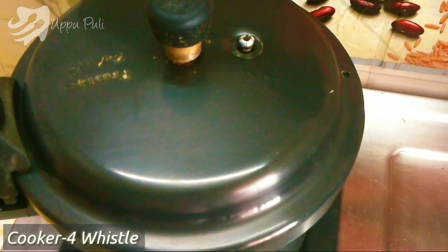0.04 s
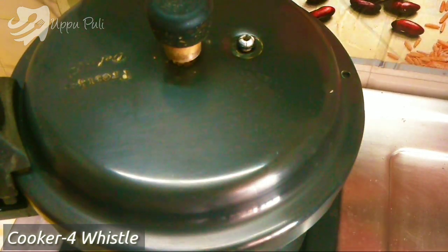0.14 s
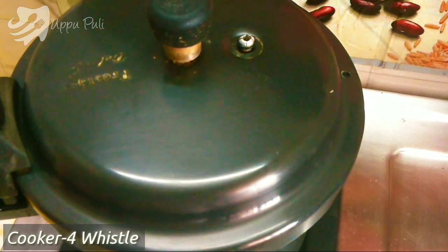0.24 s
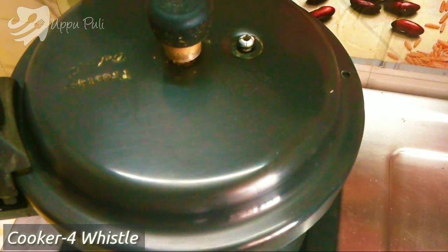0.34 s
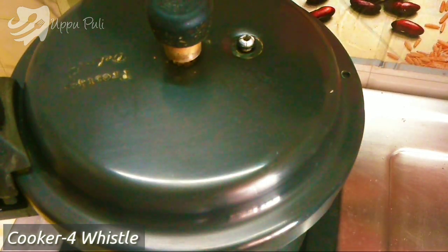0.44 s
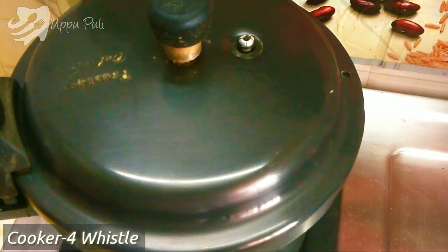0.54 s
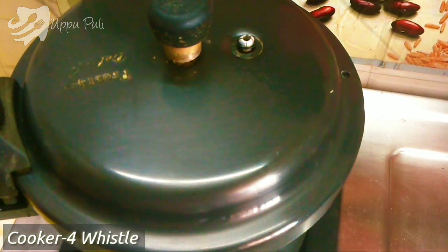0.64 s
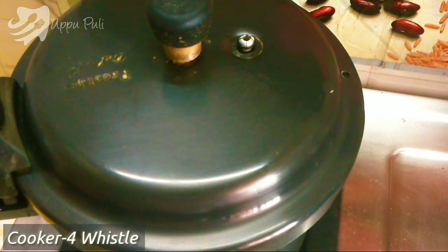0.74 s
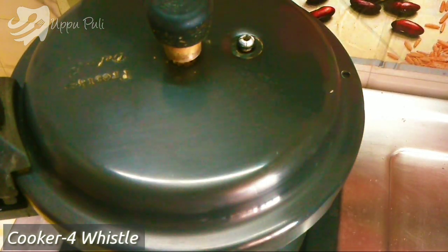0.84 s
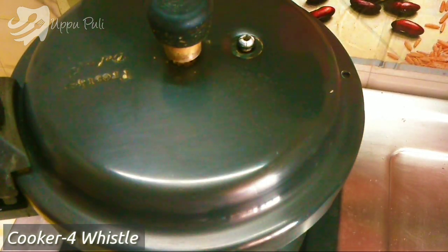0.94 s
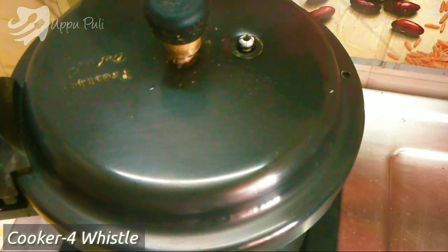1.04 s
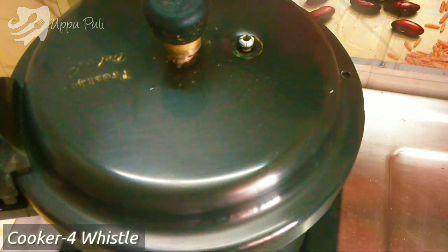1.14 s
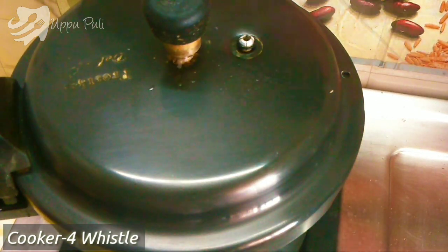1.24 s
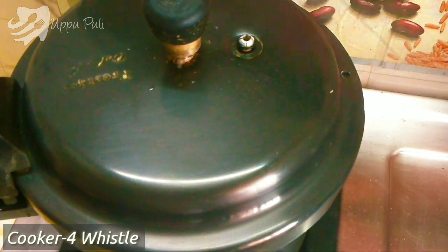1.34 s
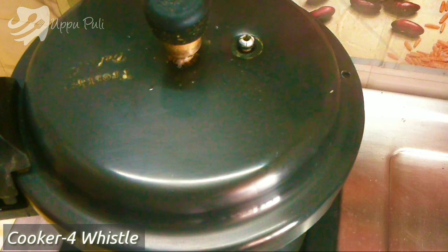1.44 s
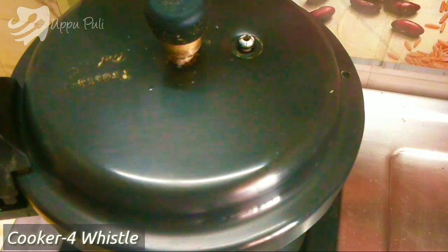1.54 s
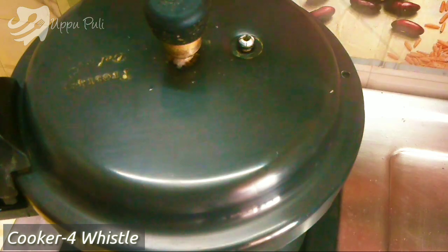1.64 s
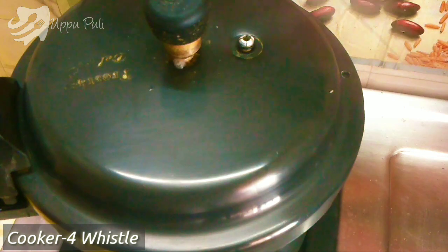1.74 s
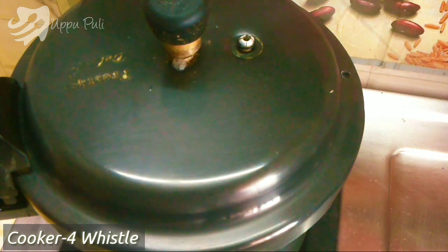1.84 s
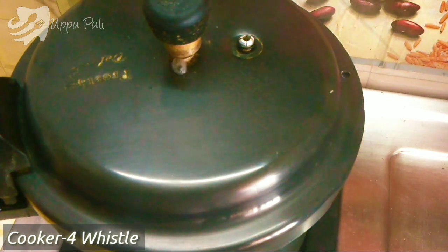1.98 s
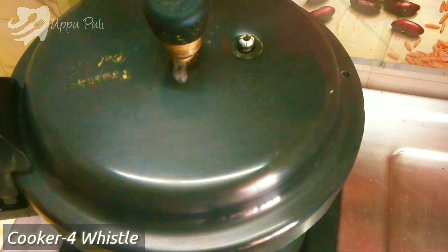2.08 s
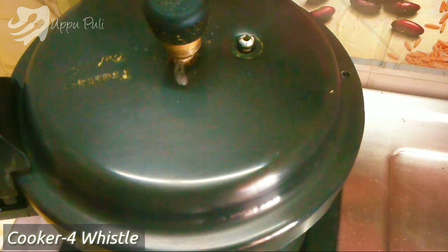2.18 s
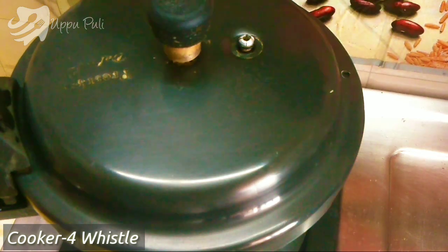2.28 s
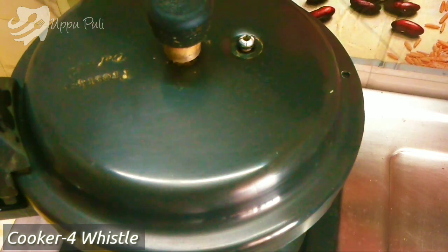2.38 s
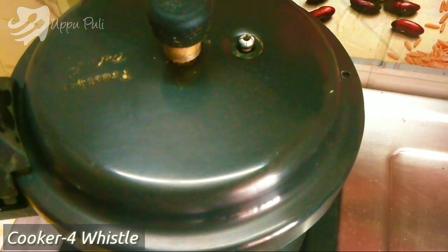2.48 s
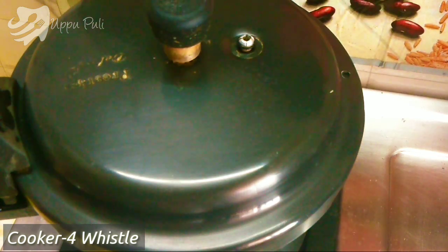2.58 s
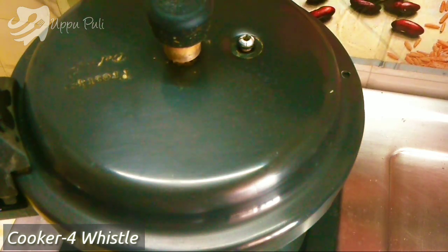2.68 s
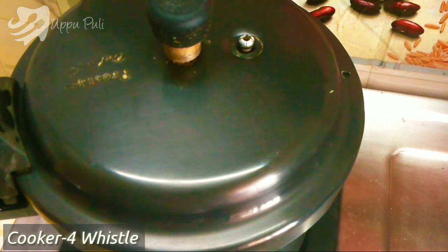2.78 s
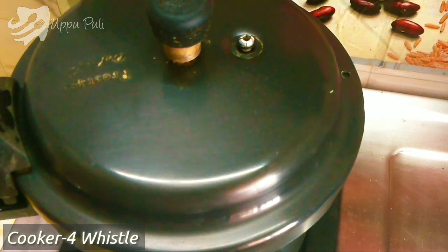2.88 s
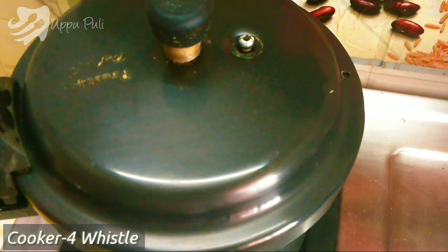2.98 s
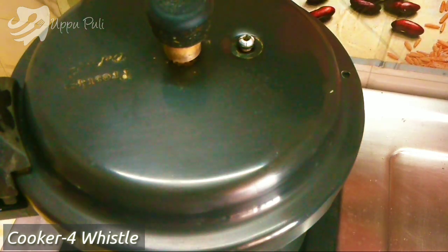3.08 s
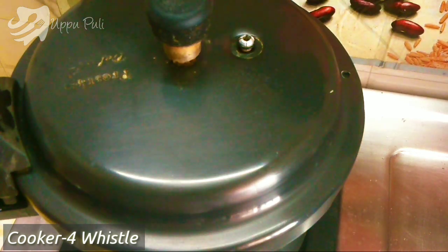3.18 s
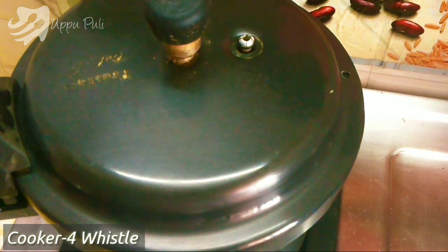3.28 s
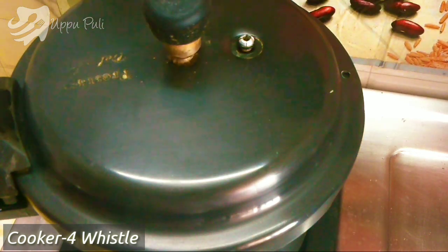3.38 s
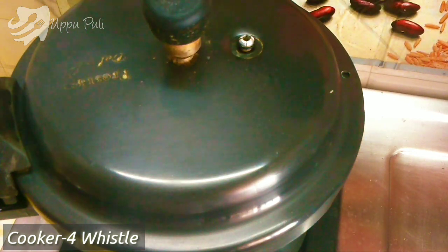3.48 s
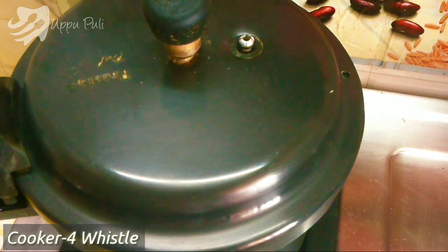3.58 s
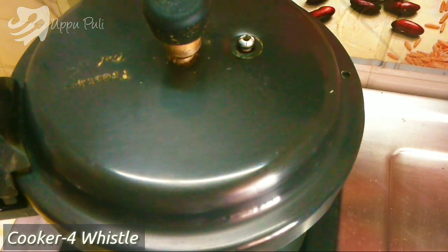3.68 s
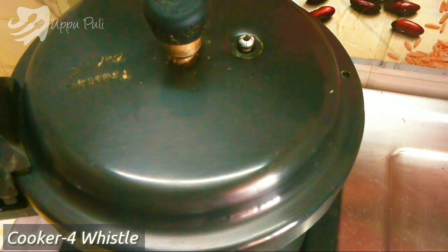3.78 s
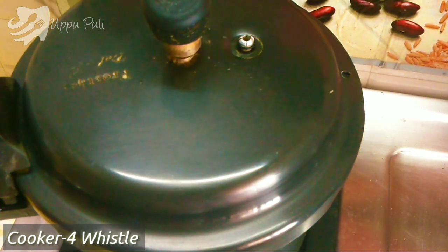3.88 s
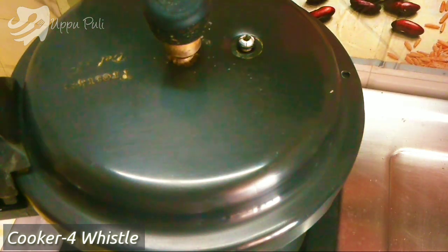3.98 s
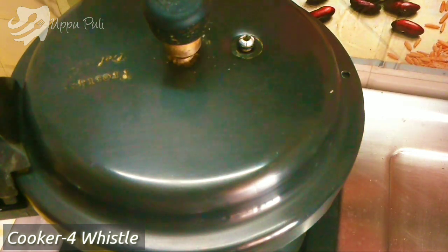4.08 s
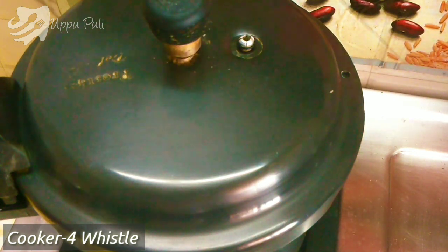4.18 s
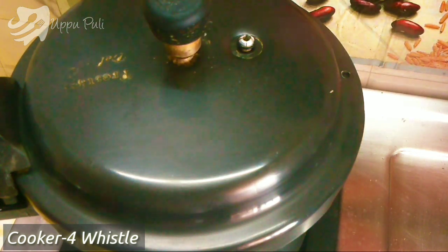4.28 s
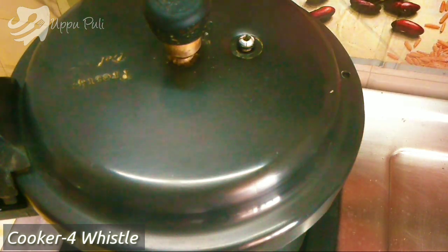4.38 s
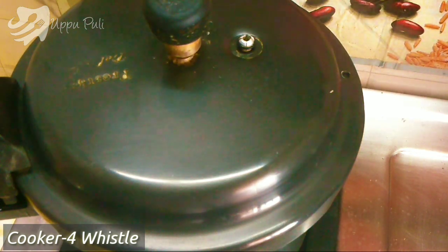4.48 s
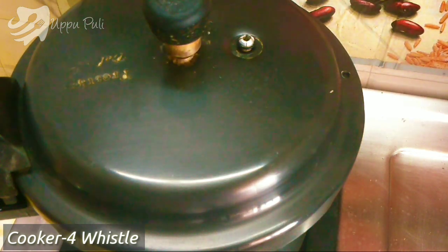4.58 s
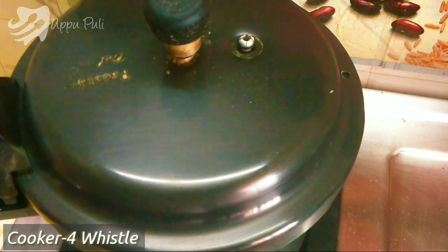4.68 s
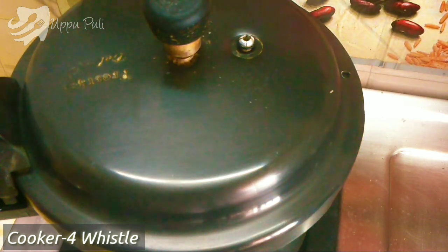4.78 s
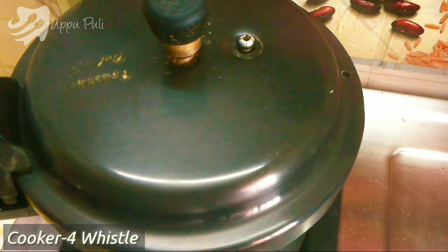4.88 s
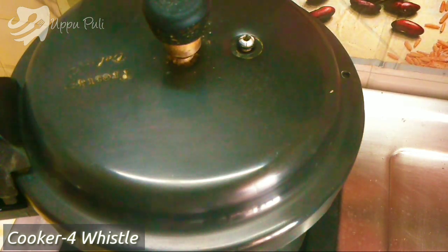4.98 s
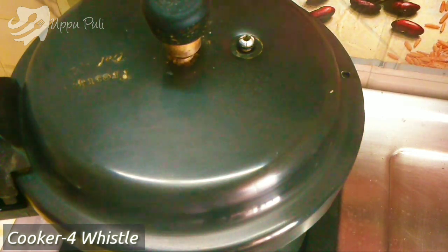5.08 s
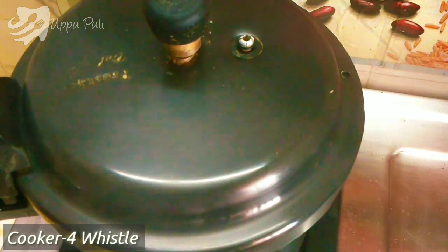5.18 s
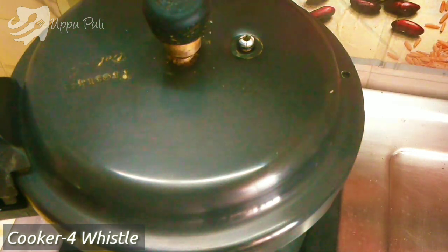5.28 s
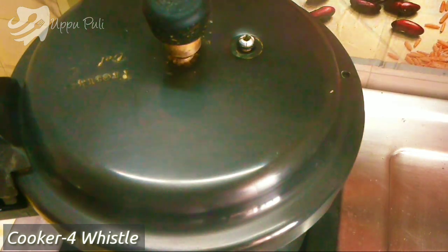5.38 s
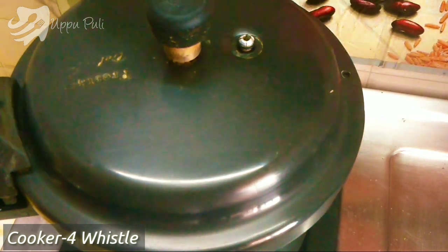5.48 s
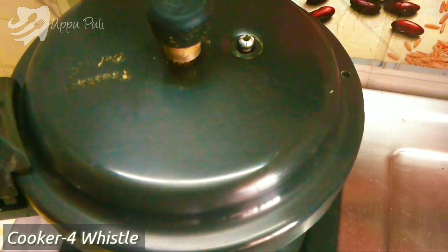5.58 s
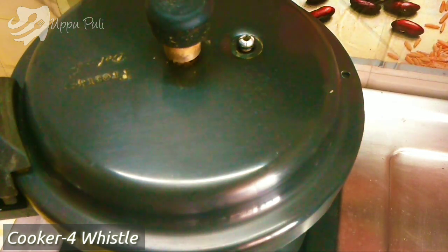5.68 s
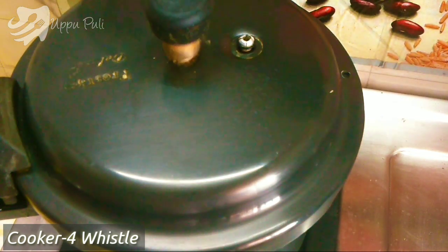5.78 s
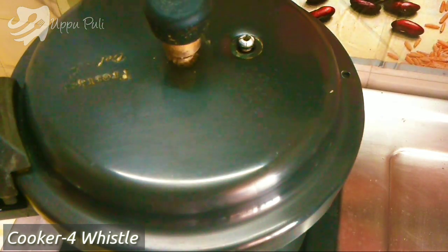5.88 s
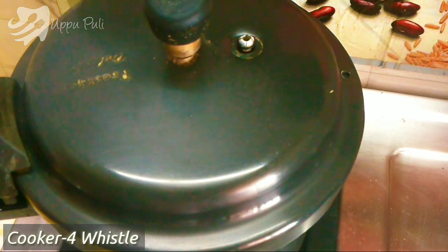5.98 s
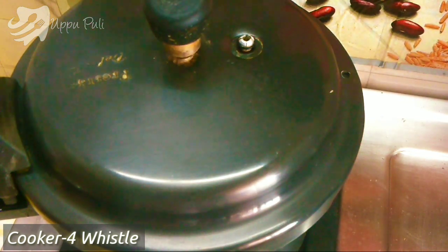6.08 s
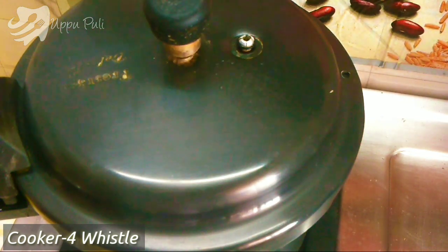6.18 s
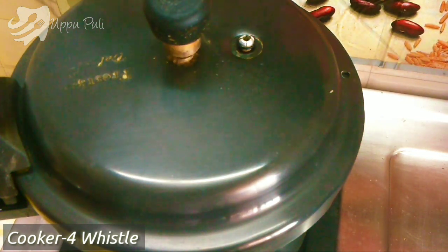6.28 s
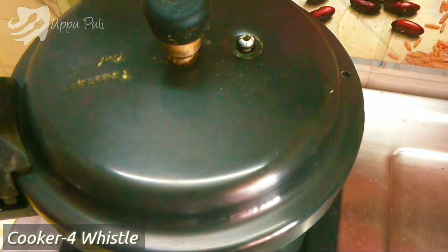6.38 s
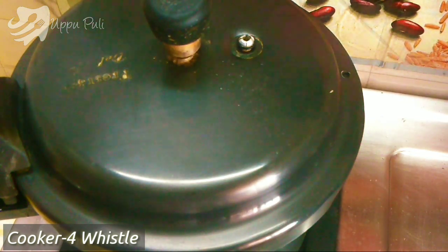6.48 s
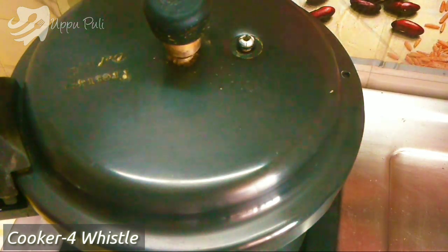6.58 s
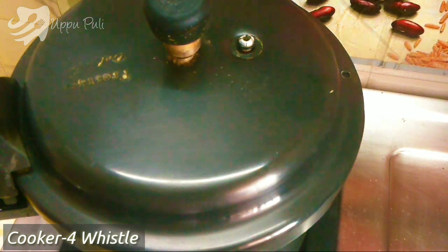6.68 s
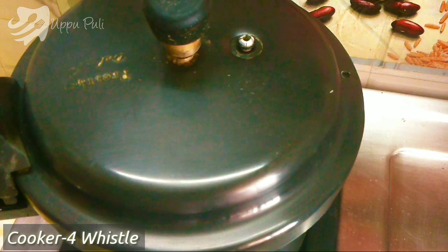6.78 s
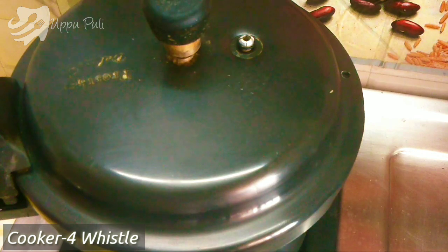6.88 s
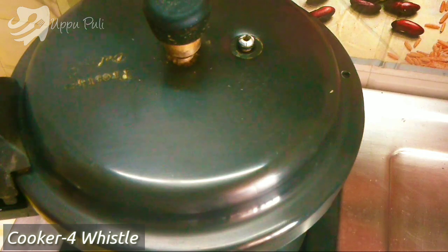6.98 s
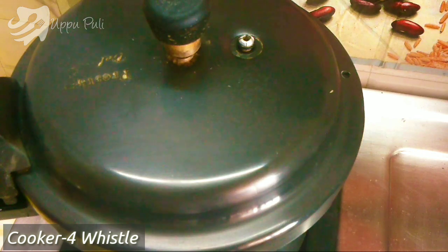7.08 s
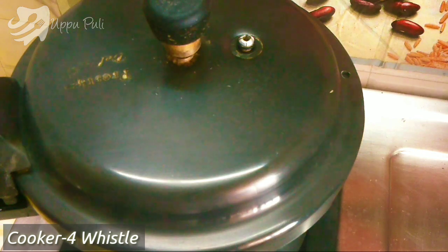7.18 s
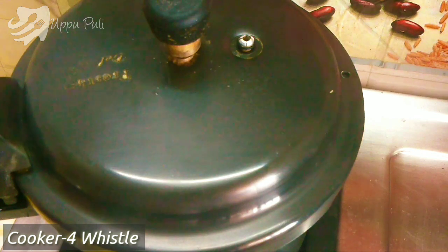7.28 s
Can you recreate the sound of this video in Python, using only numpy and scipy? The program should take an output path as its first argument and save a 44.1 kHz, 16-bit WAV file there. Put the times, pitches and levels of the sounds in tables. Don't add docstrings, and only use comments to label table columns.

```python
import sys
import numpy as np
from scipy import signal
from scipy.fft import rfft, irfft, next_fast_len
from scipy.io import wavfile
from scipy.ndimage import uniform_filter1d, map_coordinates

SR = 44100
rng = np.random.default_rng(int(sys.argv[2]) if len(sys.argv) > 2 else 0)


def dump(signal):
    limited = np.clip(np.atleast_2d(signal).T, -1, 1)
    pcm = np.round(limited * 32767).astype(np.int16)
    wavfile.write(sys.argv[1], SR, pcm)


def gain_from_decibels(decibels):
    exponent = np.asarray(decibels, float) / 20
    return 10 ** exponent


N = 323694
T = np.arange(N) / SR

SHOT_CHANGES = [
    2.3212,
    5.5612,
]
# start_db, growth_db_per_s
LEAK_BUILD = [
    (-34.5, 1.7),
    (-33, 4.5),
    (-30.5, 10),
]
# start_s, fade_in_s, level_at_lift_db, growth_db_per_s
WEIGHT_TILTS = [
    (1.076, .012, -21.5, 32),
    (3.19, .05, -15.5, 165),
    (5.88, .045, -6.5, 107),
]
# fully_open_s, rise_db_per_s, surge_db, surge_hold_s, steady_jet_db
WEIGHT_LIFTS = [
    (1.187, 700, 1.5, 0.092, -12.5),
    (3.315, 420, 7.5, 0.12, -12.5),
    (5.945, 296, 8, 0.038, -12.6),
]
# time_s, length_s, level_db
LEVEL_DIPS = [
    (2.272, .002, -4),
]
# freq_hz, level_db (per Hz)
LEAK_COLOUR = [(240, -38), (400, -20.5), (818, -17.5), (1160, -18), (3580, -14), (3930, -8), (4300, -12.5),
               (6300, -2.5), (8160, -8.5), (9640, -4), (15200, -24)]
# freq_hz, level_db (per Hz)
JET_COLOUR = [(120, -50), (200, -36), (345, -33), (593, -25.5), (1320, -19), (2110, -9.5), (2490, -12.5),
              (3030, -5.5), (6150, -4), (7240, -2), (10400, -1.5), (15200, -12.5)]
# freq_hz, width_hz, leak_db, jet_db
CAVITY_MODES = [(1960, 260, 3, -1.5), (2930, 320, 4.5, 2.5), (4115, 180, 2, 2), (4260, 190, -3, -4.5),
                (5320, 460, -1.5, 2), (5710, 240, 1, 1.5), (6040, 220, -3.5, -1.5), (6360, 350, 1, -0.5),
                (7130, 190, 3, 3.5), (7900, 370, 0, -2), (9530, 540, 1, 1.5), (10220, 290, 0, 2),
                (11340, 210, 3, -7), (11820, 200, 6, 1.5), (12240, 210, 1, 4.5), (13000, 300, -1.5, -2),
                (13500, 250, 1.2, -1), (14200, 230, 10, 4.5), (14900, 370, 5, 3.5)]
# pitch_hz, width_hz, blast_1_db, blast_2_db, blast_3_db
EDGE_TONES = [
    (3950, 280, -16.5, -24, -26),
    (4840, 130, -22.5, -21, -18),
    (5380, 200, -27, -19, -18),
    (10780, 89, -24.5, -16.5, -19),
]
# freq_hz, level_db (per Hz)
ROOM_COLOUR = [(12, -52), (20, -22), (36, -6.5), (85, -1), (329, -7.5), (424, -16.5), (455, -11.5),
               (665, -15.5), (742, -14), (1010, -23), (1500, -24), (1950, -55), (3300, -120)]
# freq_hz, width_hz, boost_db
STANDING_WAVES = [(52, 8.7, 6.5), (86, 11.3, 8), (135, 14, 4.5), (177, 16, 2.5), (252, 10, 2)]
# time_s, boost_db
GROANS = [(.05, 4), (.68, 3), (1.75, 6), (2.0, 5), (2.45, 1), (4.53, 9), (4.85, 5), (5.2, 8), (5.4, 7),
          (5.82, 2)]
# time_s, level_db
DRAG_LEVEL = [(0.28, -63), (0.3, -62), (0.306, -50), (0.352, -38), (0.482, -41.5), (0.556, -51),
              (0.56, -46)]
# freq_hz, width_hz, level_db
DRAG_BODY = [(430, 140, -7), (690, 110, -3), (910, 110, -2.5), (1150, 220, -9.5), (1520, 300, -7),
             (1960, 220, -5), (2200, 100, -2)]
CHANNEL_FLICKERS = [.357, 1.033, 1.3, 1.312, 1.428, 2.099, 2.453, 2.914, 3.1, 3.213, 3.385, 3.471, 3.608, 4.513,
                    4.54, 4.586, 5.004, 5.074, 5.399, 6.142, 6.351, 6.699, 6.815]


def unit(x):
    return x / np.sqrt(np.mean(x ** 2) + 1e-20)


def along(points, hz):
    freq, value = np.transpose(points)
    return np.interp(np.log(hz + 1), np.log(freq + 1), value)


def bell(hz, centre_hz, width_hz):
    return np.exp(-2 * ((hz - centre_hz) / width_hz) ** 2)


def bumps(modes, hz, axis):
    return sum(row[axis] * bell(hz, row[0], row[1]) for row in modes)


def per_shot(rows):
    return np.transpose(rows)[:, np.searchsorted(SHOT_CHANGES, T)]


def wobble(rate):
    knots = rng.standard_normal(int(N * rate / SR) + 4)
    return map_coordinates(knots, [np.arange(N) * rate / SR])


def filtered(x, response):
    size = next_fast_len(N + SR // 2)
    return irfft(rfft(x, size) * response(np.fft.rfftfreq(size, 1 / SR)), size)[..., :N]


def turbulence(patchy_db, ripple_db):
    grid = signal.stft(rng.standard_normal(N), nperseg=2048, noverlap=1536)[2]

    def field(size, count):
        over_pitch = uniform_filter1d(rng.standard_normal(grid.shape), size, 0)
        return unit(uniform_filter1d(over_pitch, count, 1))

    gain_db = patchy_db * field(size=24, count=7) + ripple_db * field(size=2, count=200)
    return signal.istft(grid * gain_from_decibels(gain_db), nperseg=2048, noverlap=1536)[1][:N]


def rumble(since, surge_db):
    def colour(hz):
        return gain_from_decibels(along(ROOM_COLOUR, hz) + bumps(STANDING_WAVES, hz, axis=2))

    roar = unit(filtered(turbulence(patchy_db=0.7, ripple_db=1.4), colour))
    rest_db, duck_db, duck_s, shaken, groan_s = -46.5, -13.5, 0.31, 0.8, 0.08
    groan_db = sum(db * np.exp(-((T - s) / groan_s) ** 2) for s, db in GROANS)
    gain_db = duck_db * (1 - np.exp(-since / duck_s)) + shaken * surge_db
    return gain_from_decibels(rest_db + gain_db + groan_db + 0.68 * wobble(11)) * roar


def valve():
    knee_s, settle_s, build_s = 0.0063, 0.26, 0.13
    start_db, creep = per_shot(LEAK_BUILD)
    tilt_s, fade_s, tilt_db, tilt_rise = per_shot(WEIGHT_TILTS)
    open_s, rise, surge_db, hold_s, jet_db = per_shot(WEIGHT_LIFTS)
    shot_start_s = per_shot([[0], *np.c_[SHOT_CHANGES]])[0]
    since = T - open_s
    before = knee_s * np.logaddexp(0, -since / knee_s)
    after = np.maximum(since, 0)
    surge_db = surge_db * np.exp(-np.maximum(since - hold_s, 0) / settle_s)

    leak = gain_from_decibels(start_db + creep * (np.minimum(T, open_s) - shot_start_s) + 0.93 * wobble(5.77))
    tilt_fade = np.clip((T - tilt_s) / fade_s + 0.5, 0, 1) * np.exp(-after / knee_s)
    tilt = gain_from_decibels(tilt_db - tilt_rise * before) * tilt_fade
    jet = gain_from_decibels(jet_db + surge_db - rise * before + 0.3 * wobble(4))
    flow_db = 10 * np.log10(leak ** 2 + tilt ** 2 + jet ** 2)
    return flow_db, after, surge_db * np.clip(1 - before / build_s, 0, 1)


def hiss(spectrum, axis, patchy_db, ripple_db):
    def colour(hz):
        return gain_from_decibels(along(spectrum, hz) + bumps(CAVITY_MODES, hz, axis))

    return unit(filtered(turbulence(patchy_db, ripple_db), colour))


def leak_hiss():
    flutter_db = 0.93 * wobble(25) + 0.28 * wobble(120)
    return hiss(LEAK_COLOUR, axis=2, patchy_db=1.1, ripple_db=2.0) * gain_from_decibels(flutter_db)


def jet_roar():
    flutter_db = 0.36 * wobble(14) + 0.4 * wobble(150)
    return hiss(JET_COLOUR, axis=3, patchy_db=0.94, ripple_db=2.5) * gain_from_decibels(flutter_db)


def wet_gust(since, surge_db):
    gust = unit(filtered(rng.standard_normal(N), lambda hz: 1 / (1 + (hz / 1300) ** 2)))
    breaking = (gain_from_decibels(surge_db) - 1) * np.exp(-since / 0.042)
    return gain_from_decibels(-27) * breaking * gust


def whistles(since, surge_db):
    leak_db, grow_s, sings = -23.5, 0.51, 1.2
    grown = 1 - np.exp(-since / grow_s)
    total = np.zeros(N)
    for pitch_hz, width_hz, *blast_db in EDGE_TONES:
        level_db = leak_db + grown * (per_shot(np.c_[blast_db])[0] - leak_db)
        if pitch_hz == EDGE_TONES[0][0]:
            level_db = level_db + sings * surge_db
        tone = filtered(rng.standard_normal(N), lambda hz: 1 / (1 + (2 * (hz - pitch_hz) / width_hz) ** 2))
        total += gain_from_decibels(level_db) * unit(tone)
    return total


def steam(flow_db, since, surge_db):
    lift = np.clip((flow_db + 29.5) / 9, 0, 1) * np.pi / 2
    flow = np.cos(lift) * leak_hiss() + np.sin(lift) * jet_roar()

    body = filtered(flow, lambda hz: 1 / (1 + (hz / 2500) ** 4))
    flow = flow + (gain_from_decibels(1.5 * np.sin(2 * lift)) - 1) * body

    mids = filtered(flow, lambda hz: bell(hz, 3400, 1800))
    flow = flow + (gain_from_decibels(-0.27 * surge_db) - 1) * mids + wet_gust(since, surge_db)

    dip = filtered(flow, lambda hz: bell(hz, 11380, 250))
    filled_db = 5 * np.sin(lift) * np.exp(-since / 1.2)
    flow = flow + (gain_from_decibels(filled_db) - 1) * dip

    flow = flow + whistles(since, surge_db)
    level_dip_db = sum(db * np.exp(-((T - s) / length) ** 2) for s, length, db in LEVEL_DIPS)
    return gain_from_decibels(flow_db + level_dip_db) * flow


def scrape():
    phase = np.cumsum(225 * (1 + 0.04 * wobble(30))) / SR
    slips = np.diff(np.floor(phase), prepend=0) * gain_from_decibels(2.5 * rng.standard_normal(N))
    force = unit(slips) + 1.8 * rng.standard_normal(N)

    def body(hz):
        total = 0
        for k, (centre, width, db) in enumerate(DRAG_BODY):
            damping = 1j * hz * width
            total = total + (-1) ** k * gain_from_decibels(db) * damping / (centre ** 2 - hz ** 2 + damping)
        return total / (1 + (hz / 2400) ** 8)

    sounding = (T > DRAG_LEVEL[0][0]) & (T < DRAG_LEVEL[-1][0])
    level = gain_from_decibels(np.interp(T, *np.transpose(DRAG_LEVEL)))
    return level * sounding * unit(filtered(force, body))


def scene():
    flow_db, since, surge_db = valve()
    mono = steam(flow_db, since, surge_db) + rumble(since, surge_db) + scrape()
    return np.array([mono, mono])


def channel_difference(mid):
    width_hz, level_db, half_s = 1430, -1.5, 0.012
    hz, t, grid = signal.stft(mid, SR, nperseg=512)
    centres = rng.uniform(5400, 14460, size=(len(CHANNEL_FLICKERS), 2))
    bands = (abs(hz[:, None, None] - centres) < width_hz / 2).any(axis=2)
    mask = gain_from_decibels(level_db) * bands @ np.exp(-((t - np.c_[CHANNEL_FLICKERS]) / half_s) ** 4)
    power = uniform_filter1d(uniform_filter1d(abs(grid) ** 2, size=9, axis=0), size=5, axis=1)
    noise = signal.stft(rng.standard_normal(N), SR, nperseg=512)[2]
    noise = noise / np.sqrt(np.mean(abs(noise) ** 2))
    return signal.istft(mask * np.sqrt(power + 1e-20) * noise, SR, nperseg=512)[1][:N]


def band_limit(x):
    return signal.sosfilt(signal.butter(12, 15630, fs=SR, output="sos"), x)


def record(dry):
    ceiling = np.where(dry[0] > 0, 0.86, 0.73)
    hardness = 7
    mid = dry[0] / (1 + np.abs(dry[0] / ceiling) ** hardness) ** (1 / hardness)

    def band(hz):
        low_cut = hz ** 2 / (hz ** 2 + 12 ** 2)
        return low_cut * np.exp(-np.exp((hz - 15490) / 45))

    mid = filtered(mid, band)
    side = channel_difference(mid)
    return band_limit(np.array([mid + side, mid - side]))


dry = scene()
out = record(dry)
dump(out)
```